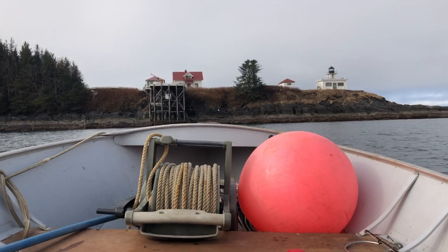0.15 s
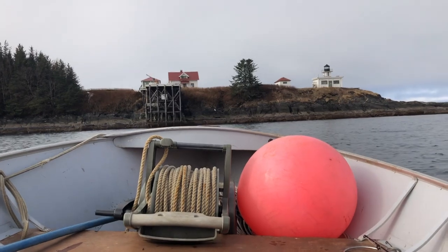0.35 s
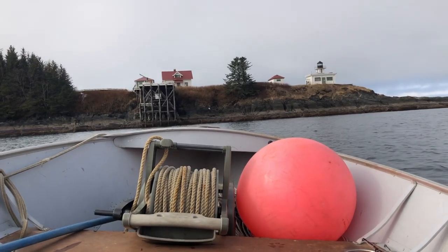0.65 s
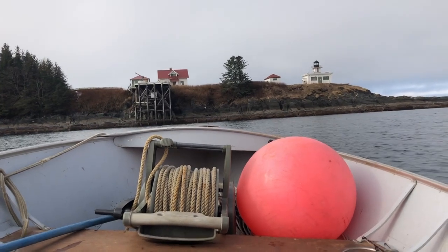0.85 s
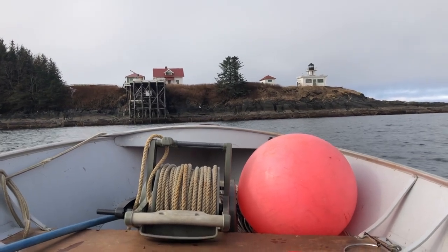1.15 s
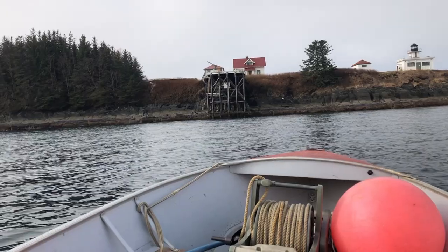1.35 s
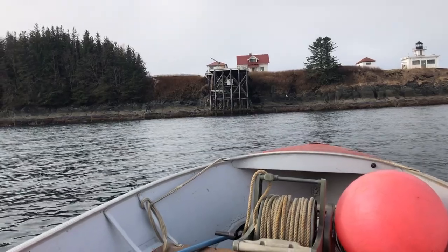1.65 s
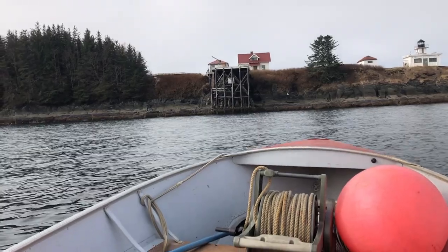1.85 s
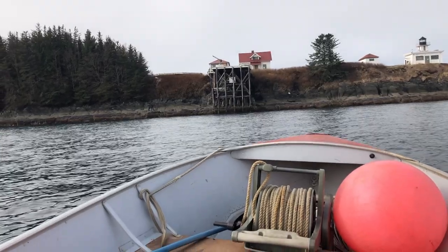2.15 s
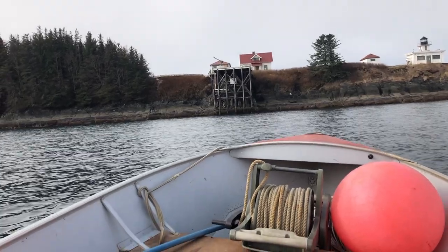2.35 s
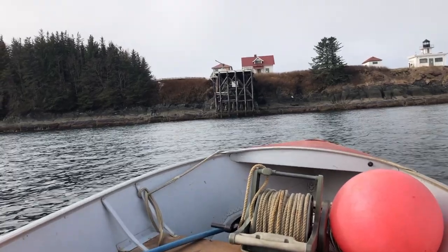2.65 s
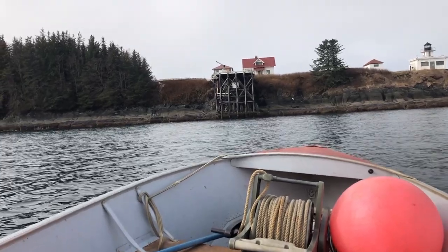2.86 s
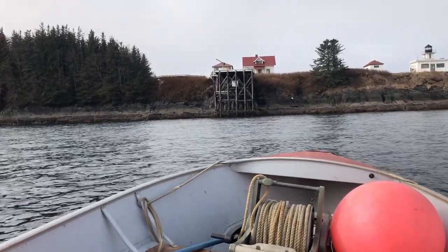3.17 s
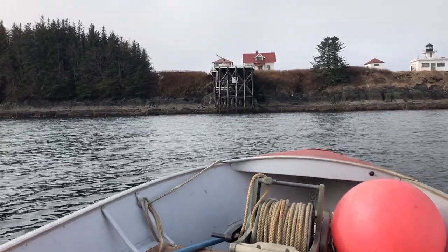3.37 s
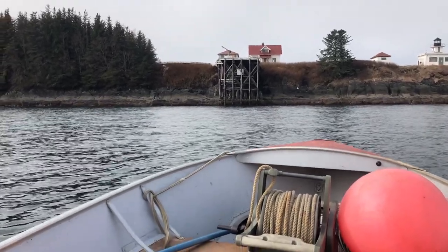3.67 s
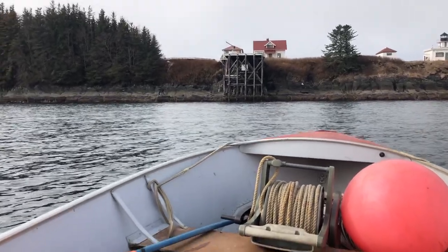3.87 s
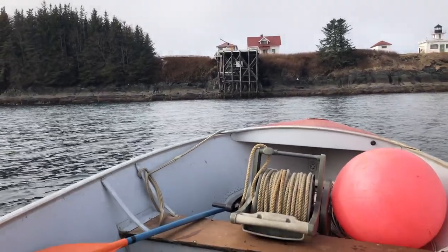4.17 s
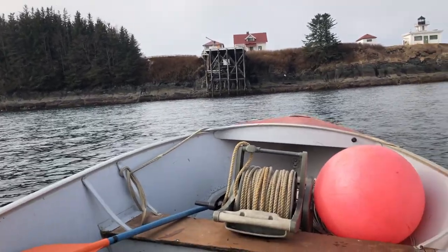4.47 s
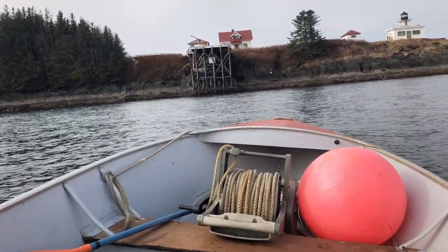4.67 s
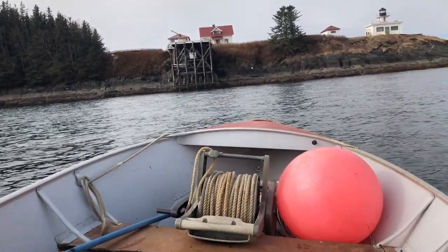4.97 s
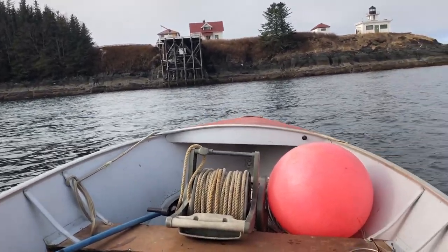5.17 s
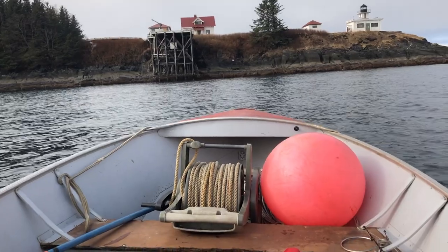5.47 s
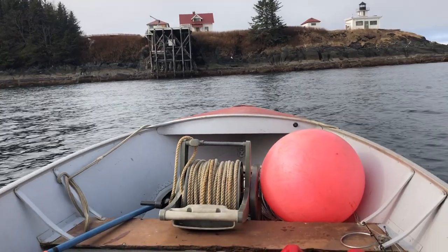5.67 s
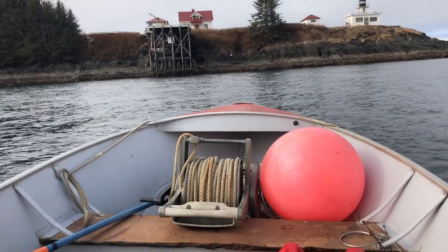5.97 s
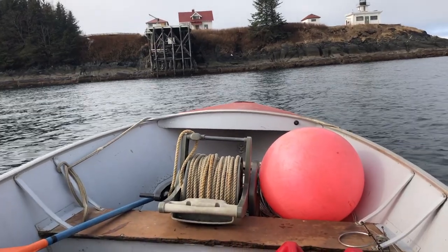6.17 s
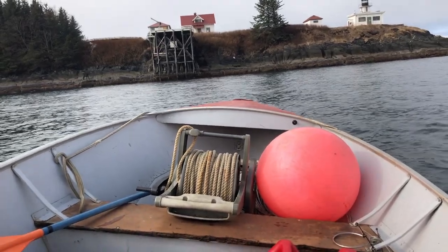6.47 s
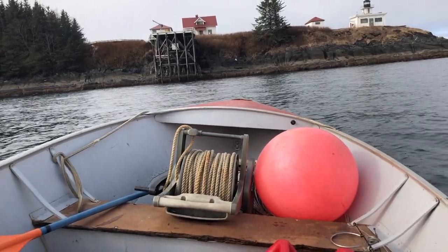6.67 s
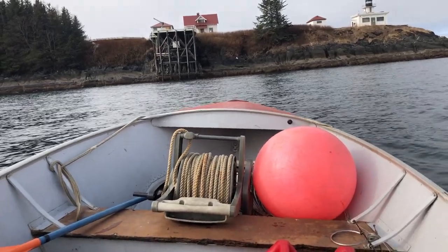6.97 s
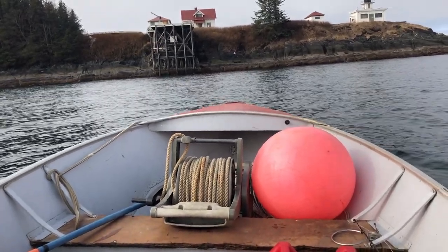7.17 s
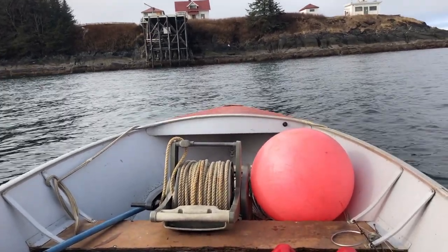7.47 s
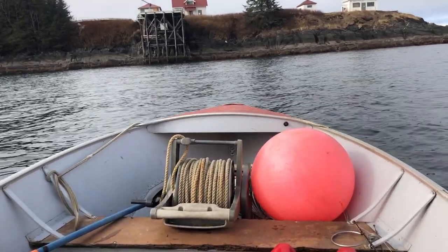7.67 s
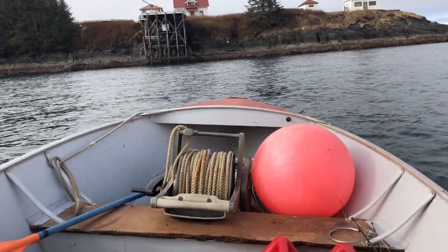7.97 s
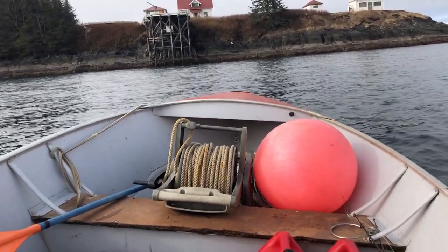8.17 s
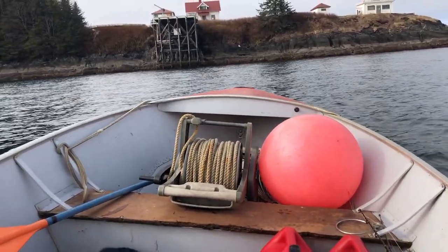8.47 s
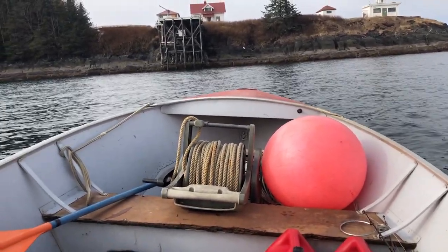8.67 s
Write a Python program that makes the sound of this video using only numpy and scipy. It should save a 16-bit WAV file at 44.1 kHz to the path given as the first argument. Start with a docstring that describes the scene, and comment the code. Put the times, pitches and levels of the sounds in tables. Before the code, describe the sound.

Heard from aboard an open metal skiff, a small outboard shakes and rattles the hull loudly with low wind bumps for about a second and fades away. It cuts back in much quieter, a quick, uneven putt-putt with hull ring. Near four seconds the throttle opens a little, smoothing the chugs into a fuller drone, while bow wash, drips, slaps and late gurgles pass close to the handheld microphone.

```python
"""A small outboard pushes an open metal skiff slowly over calm water, heard from aboard.
A loud, shaking opening fades away, then the sound cuts back in quieter; later the throttle opens a little.
Throughout, the shaft shakes the boat as sines, filtered noise and pulses chug and thump every third turn,
and resonances ring the hull. Noise and grains make the bow wash, decaying tones its thuds and drips;
low noise is wind nudging the microphone, bright noise a fine hiss."""
import sys
import numpy as np
from scipy import signal
from scipy.fft import rfft, irfft, next_fast_len
from scipy.io import wavfile
from scipy.ndimage import map_coordinates

SR = 44100
rng = np.random.default_rng(int(sys.argv[2]) if len(sys.argv) > 2 else 0)


def wrap_up_sound(samples):
    """Save the sound to the file named by the first command line argument, as 16-bit audio."""
    columns = np.atleast_2d(samples).T
    # keep every value between -1 and 1, then stretch to whole-number steps
    tamed = np.clip(columns, -1, 1)
    steps = np.round(tamed * 32767).astype(np.int16)
    wavfile.write(sys.argv[1], SR, steps)


N = 388942
T = np.arange(N) / SR
CUT_S = 1.21  # the opening ends and the quieter sound cuts in


def motion():
    """Engine cycles completed, throttle (0-1) and the boat's gain in speed (0-1), which lags behind it."""
    # Engine speed, three turns a cycle. Each row: time in seconds, rate in cycles per second.
    speed_rows = [(0, 6.78), (3.42, 6.71), (3.88, 7.58), (4.7, 7.77), (6.3, 7.665)]
    idle_hz, cruise_hz = 6.78, 7.7  # cycle rates at throttle 0 and 1
    cut_skip_cycles, hull_lag_s = .43, 3.8
    rate_hz, = curves(speed_rows)
    cycle = np.cumsum(rate_hz) / SR + cut_skip_cycles * (T >= CUT_S)
    throttle = np.clip((rate_hz - idle_hz) / (cruise_hz - idle_hz), 0, 1)
    step = 1 / (hull_lag_s * SR)
    speed = signal.lfilter([step], [1, step - 1], throttle)
    return cycle, throttle, speed


def engine(cycle, throttle, speed, fade):
    """One knock a turn, one strong firing a cycle, and the metal that they set ringing."""
    turn = 3 * cycle
    knocks = unit(beats(turn + .5, scatter_db=1.9) * amp(0.22 * np.cos(2 * np.pi * (cycle - .17))))
    surge = amp(1.0 * np.cos(2 * np.pi * (cycle - .25)) + 1.3 * np.cos(4 * np.pi * (cycle - .27)))
    opening_ring = amp(opening_then(-1, 0))
    body = exhaust(cycle, throttle) + opening_ring * hull(knocks, throttle)
    body = body + gears(turn, surge, throttle) + whoosh(cycle, throttle)
    metal = hum(turn, throttle) + whine(surge) + opening_resonance(knocks)
    return shaking(turn, throttle, speed, fade) + metal + amp(-47.5) * body


def shaking(turn, throttle, speed, fade):
    """The shaft's unbalance rocks the whole boat once a turn, with overtones at its multiples."""
    # Overtones. Each row: shaft order, relative level in dB.
    shake_orders = [(2, -12), (3, -36), (4, -17), (5, -22), (6, -46.5)]
    # rises with throttle, falls again as the boat gathers speed
    level_db = opening_then(-8, -30.5) + 5 * (throttle - 2 * speed)
    overtones = orders(turn - .07, shake_orders, unsteady_db=4.0)
    overtones = amp(opening_then(-18.5, -39.5)) * fade * overtones  # these fade deeper than the rest
    return amp(level_db) * (np.sqrt(2) * np.cos(2 * np.pi * (turn - .07)) + overtones)


def exhaust(cycle, throttle):
    """Firing pulses swell through the submerged leg and boom in the hull, over a noise rumble."""
    # Exhaust leg under water. Each row: centre in Hz, width in Hz, relative level in dB.
    pipe_modes = [(170.5, 120, 0)]
    # Hull boom. Each row: centre in Hz, width in Hz, relative level in dB.
    thump_modes = [(258.6, 5.3, -17), (330, 9.1, -15), (369.5, 24, -3)]
    # Harder exhaust under throttle. Each row: centre in Hz, width in Hz, relative level in dB.
    bark_modes = [(325, 58, 0)]
    # Rumble. Each row: frequency in Hz, relative level in dB per Hz.
    drone_spectrum = [(30, -44), (60, 0), (110, 1), (185, 2.5), (228, -2), (290, -2.5), (400, -5.5),
                      (500, -20), (900, -85)]
    thump_spectrum = [(40, -27.5), (105, 5.5), (162, 6.0), (215, 4.0),
                      (260, -12.0), (400, 5.0), (700, -25), (2000, -30)]
    pulses = beats(cycle + 0.0211 + 0.022 * throttle, scatter_db=0.5)
    firing = ring(pulses * amp(opening_then(-2, 0)), pipe_modes)
    thump = coloured(ring(firing, thump_modes), thump_spectrum)
    bark = ring(ring(firing, bark_modes), bark_modes)
    drone_db = opening_then(5, 1) + np.cos(2 * np.pi * (cycle - 0.026)) + 1.1 * wobble(8.0)
    drone = coloured(noise(), drone_spectrum) * amp(drone_db)
    return amp(-6.5 + 1.1 * throttle) * thump + drone + amp(-20 + 9.1 * throttle) * bark


def hull(knocks, throttle):
    """Each turn knocks hull and cowling into resonance; the chugs melt away as the throttle opens."""
    # Hull ring. Each row: centre in Hz, width in Hz, relative level in dB.
    hull_modes = [(242, 37, 0.5), (310, 8, -12), (368.6, 17.5, 9.5), (731, 18, 3), (828.5, 15, 1),
                  (905, 26, 0), (1143, 11, -2.5), (1776, 15, -5), (2223, 67, -10.5)]
    # Cowling at low throttle. Each row: centre in Hz, width in Hz, relative level in dB.
    chug_modes = [(259, 6.2, -2), (365.4, 5.4, 18.5), (495, 85, 1.5), (666, 28, -1), (1115, 16, -3)]
    knock = ring(0.74 * knocks + 1.94 * rasp(knocks, life_s=0.021), hull_modes)
    chug = ring(0.23 * knocks + 1.5 * rasp(knocks, life_s=0.0073), chug_modes)
    return amp(-7.5 + 2.0 * throttle) * knock + amp(-3.5 - 21.0 * throttle) * chug


def gears(turn, surge, throttle):
    """The gears repeat one rough pattern every turn, which with fresh noise makes the panels buzz."""
    # Buzzing panels. Each row: centre in Hz, width in Hz, relative level in dB.
    whirr_modes = [(724, 16, 4), (830, 14, 1.5), (934, 42, 2.5), (1215, 20, -6.5), (1336, 49, 9.5),
                   (1447, 52, 2.5), (1790, 13, -12.5), (2230, 23, -4)]
    teeth = rng.standard_normal(1900)
    mesh = teeth[(turn % 1 * len(teeth)).astype(int)]
    return amp(-9.5 + 2.8 * throttle) * ring((0.78 * mesh + noise()) * surge, whirr_modes)


def whoosh(cycle, throttle):
    """After each firing, low noise on a rising carrier sweeps upward over half a cycle."""
    stroke = np.minimum(cycle % 1 / .5, 1)
    sweep_hz = np.interp(stroke, [0, .5, 1], [900, 1500, 1850])
    carrier = np.sin(2 * np.pi * np.cumsum(sweep_hz) / SR)
    breath = coloured(noise(), [(10, -14.0), (110, -0.5), (220, -3.5)])
    return amp(-13 + 4.0 * throttle) * breath * np.sin(np.pi * stroke) * carrier


def hum(turn, throttle):
    """Steady tones on multiples of the shaft's rotation; their balance shifts with throttle."""
    # Hull and panel tones. Each row: shaft order, level in dB idling, level in dB under throttle.
    hum_orders = [(2, -58, -47.5), (3, -48, -53), (4, -60, -48), (5, -60.5, -54), (6, -54, -56.5),
                  (31, -77, -65), (36, -76, -65)]
    out = np.zeros(N)
    for order, idle_db, cruise_db in hum_orders:
        level_db = idle_db + (cruise_db - idle_db) * throttle + 1.25 * wobble(3.8)
        out += amp(level_db) * np.cos(2 * np.pi * (round(order) * turn + rng.random()))
    return np.sqrt(2) * out


def whine(surge):
    """One panel sings in spells: surging noise through the same narrow resonance twice."""
    # Singing panel. Each row: centre in Hz, width in Hz, relative level in dB.
    whine_modes = [(1469.5, 67, 0)]
    # Spells. Each row: time in seconds, level in dB.
    whine_levels = [(0, -74), (3.4, -63.5), (3.75, -54), (4.25, -65), (4.65, -51.5), (5, -57), (5.2, -66),
                    (5.87, -52.5), (6.08, -69), (6.4, -49), (6.75, -62), (7.05, -51.5), (7.5, -51.5),
                    (7.9, -62), (8.8, -52)]
    level_db, = curves(whine_levels)
    return amp(level_db) * ring(ring(noise() * surge, whine_modes), whine_modes)


def opening_resonance(knocks):
    """In the opening, bursts of noise after each knock ring a further set of the boat's resonances."""
    # Opening resonances. Each row: centre in Hz, width in Hz, relative level in dB.
    opening_modes = [(205, 50, -0.5), (345, 40, -2), (440, 33, -3), (530, 25, 0), (653, 29, 2),
                     (832, 30, 12.5), (1135, 45, 4), (1207, 40, -2.5), (1897, 44, -21.5), (2310, 65, -15)]
    return amp(-52.5) * (T < CUT_S) * ring(rasp(knocks, life_s=0.014), opening_modes)


def strokes(cycle, throttle, speed):
    """The chugs, rings and ticks of each cycle; each firing gives a rising thump, then a putt."""
    # Falling chugs, firing top, exhaust bubble, panel rings, valve ticks. Each row: share of the cycle,
    # peak dB idling, peak dB under throttle (both before the opening cut), centre pitch in Hz, life in
    # seconds, glide share, roughness share.
    stroke_rows = [ (.195, -42.5, -63, 510, .024, -0.586, 0.13), (0.58, -45, -60, 490, 0.027, -.55, 0.13),
                   (.86, -44.5, -69, 510, .024, -0.73, 0.077),
                   (0.021, -49.5, -45.5, 326.5, 0.0242, 0.18, 0.097),
                   (0.193, -49, -48, 261.6, 0.04475, 0.12, 0.018),
                   (0.096, -54.5, -53, 860, .03, 0.088, 0.064),
                   (0.2304, -64, -55, 1490, .022, 0.012, 0.063), (.91, -52, -53, 1400, .04, -0.039, 0.021),
                   (0.4, -59.5, -56.5, 1820, 0.036, 0.035, 0.029),
                   (0.23, -63, -58.5, 2250, .06, 0.01, 0.014), (.81, -57.5, -60, 2000, .035, -0.023, 0.018),
                   (.535, -59, -58, 3350, 0.019, 0.054, 0.085),
                   (.7, -62.5, -60.5, 4500, 0.012, 0.072, 0.05)]
    # Strong and weak spells of the putt. Each row: time in seconds, peak dB (before the opening cut).
    putt_levels = [(0, -52.5), (1.3, -47), (1.6, -54), (1.75, -44), (1.89, -42), (2.04, -51), (2.19, -43),
                   (2.34, -53), (2.49, -46), (2.64, -41), (2.94, -42.5), (3.08, -49), (3.23, -45),
                   (3.38, -55), (3.53, -41.5), (3.8, -39.5), (4.07, -43), (4.6, -45.5), (5, -45),
                   (8.8, -54)]
    out = np.zeros(N)
    passes = lambda phase: np.flatnonzero(np.diff(np.floor(phase)))
    for at, idle_db, cruise_db, hz, life_s, glide, rough in stroke_rows:
        for i in passes(cycle - at):
            size, detune = rng.standard_normal(2)
            db = idle_db + (cruise_db - idle_db) * throttle[i] + 1.9 * size
            add(out, T[i] - life_s / 2, amp(db) * chirp(hz * (1 + .012 * detune), life_s, glide, rough))

    thump_life_s = 0.0396  # exhaust bubble; comes earlier under throttle
    for i in passes(cycle - 0.0276 + 0.0292 * throttle):
        thump = chirp(163.6, thump_life_s, glide=0.54, rough=.06)
        db = -33 + 0.9 * throttle[i] + 0.6 * rng.standard_normal()
        add(out, T[i] - thump_life_s / 2, amp(db) * thump)

    putt_db, = curves(putt_levels)
    putt_life_s = .032
    for i in passes(cycle - 0.2465 + 0.04035 * throttle):
        putt = chirp(1319 + 50 * speed[i], putt_life_s, glide=0.084 + 0.15 * speed[i], rough=0.036)
        add(out, T[i] - putt_life_s / 2, amp(putt_db[i]) * putt)
    return out * amp(opening_then(-2, 0))


def water(speed):
    """The bow wave gurgles, fizzes and patters, changing with speed and swelling with each passing wave."""
    # Waves along the bow. Each row: crest in seconds, rise in seconds, fall in seconds,
    # wash level in dB and spray level in dB, both before the trims below.
    wave_rows = [(.25, 0.19, 0.056, -43, -49), (.56, 0.13, 0.056, -49.5, -58),
                 (2.11, 0.097, 0.018, -49, -61.5), (2.35, 0.042, 0.099, -53, -73),
                 (3.7, 0.56, .3, -56.5, -64), (4.72, 0.069, 0.32, -55, -67), (5.27, 0.046, 0.044, -57, -63),
                 (6.15, 0.14, 0.3, -55, -65), (6.4, 0.055, 0.025, -46.5, -59),
                 (7.05, 0.12, 0.39, -46.5, -58.5), (7.45, 0.064, 0.028, -50, -59),
                 (7.85, 0.13, 0.034, -47.5, -59.5), (8.16, 0.03, 0.098, -50, -66),
                 (8.7, 0.28, 0.56, -44, -61)]
    # Wash. Each row: frequency in Hz, relative level in dB per Hz.
    wash_spectrum = [(200, -8.5), (420, -3.5), (600, -4), (830, -4.7), (1150, -5.5), (1500, -10.5),
                     (1950, -13), (2400, -15), (3200, -22.5), (6000, -86)]
    # Spray. Each row: frequency in Hz, relative level in dB per Hz.
    spray_spectrum = [(900, -18), (1800, -21), (3000, 5.5), (4500, 4), (5500, 2), (6500, -5), (8000, -4),
                      (9800, -8), (12000, -12.5), (15500, -28)]
    wash_swells = [(s, rise, fall, db) for s, rise, fall, db, _ in wave_rows]
    spray_swells = [(s, rise, fall, db) for s, rise, fall, _, db in wave_rows]
    wash_db = swelling(opening_then(-46.5, -53) + 5.5 * speed, wash_swells)
    spray_db = swelling(opening_then(-61, -64.5) + 1.5 * speed, spray_swells)
    gurgle = grains(rate_hz=250, low_hz=379, high_hz=2550, cycles=2.6, spread_db=2.5)
    fizz = grains(rate_hz=540, low_hz=1820, high_hz=10380, cycles=17.0, spread_db=2.5)
    wash = coloured(noise() + 0.21 * gurgle, wash_spectrum) * amp(wash_db - 1 + 1.3 * wobble(25))
    spray = coloured(noise() + opening_then(0.31, .42) * fizz, spray_spectrum)
    spray = spray * amp(spray_db - 0.5 + 1.1 * wobble(30))
    patter_db = np.minimum(spray_db, -57.5) - 10.5  # droplets stop growing in heavy spray
    return wash + spray + amp(patter_db) * patter()


def patter():
    """Droplets of spray land as short, bright ticks of decaying noise, at rms 1."""
    # Tick colour. Each row: frequency in Hz, relative level in dB per Hz.
    patter_spectrum = [(2000, -22.5), (4300, 8.5), (5500, 0), (7500, -1.5), (10000, -4), (13000, -14)]
    drops_per_s, spread_db, life_s = 70, 3.5, .0025
    hits = (rng.random(N) < drops_per_s / SR) * amp(spread_db * np.clip(noise(), -2, 1.5))
    return coloured(lag(hits, life_s) * noise(), patter_spectrum)


def splashes():
    """Single waves thud and slap on the hull, drops fall back and larger bubbles chirp."""
    # Waves under the bow. Each row: start in seconds, level in dB before a 7.5 dB cut, pitch that it
    # sags to in Hz, t60 in seconds.
    thud_rows = [(1.047, -10.5, 249, 0.083), (1.345, -15.5, 268, 0.072), (2.326, -20, 246, 0.12),
                 (3.208, -17.5, 254, 0.14), (3.767, -21, 261, 0.11), (6.355, -23.5, 257, 0.19),
                 (6.705, -24, 272, 0.089)]
    # Wavelets on the side. Each row: start in seconds, level in dB, t60 in seconds, tilt in dB per octave.
    slap_rows = [(1.347, -42, 0.079, -0.5), (2.318, -29.5, 0.034, 0), (2.784, -38, 0.032, 0.5),
                 (6.693, -33.5, 0.11, -2)]
    # Slap colour before tilt. Each row: frequency in Hz, relative level in dB per Hz.
    slap_spectrum = [(250, 1), (550, 2), (950, 8), (1500, 3), (2900, -11), (5600, -15.5), (9000, -38)]
    # Drops falling back. Each row: start in seconds, level in dB, pitch in Hz, t60 in seconds.
    drop_rows = [(0.43, -53, 5200, .025), (0.832, -58.5, 7000, .03), (1.047, -40, 1980, 0.028),
                 (1.517, -66, 7500, .015), (1.667, -66, 7000, .015), (1.817, -59, 7500, .02),
                 (2.006, -60, 12500, .01), (2.05, -55, 5200, .025), (2.082, -57, 7000, .025),
                 (2.104, -55, 8100, 0.023), (2.357, -54, 7200, .014), (2.39, -51, 2350, .03),
                 (2.401, -51.5, 3800, 0.043), (2.703, -56, 7500, 0.013), (2.732, -59, 8000, .015),
                 (3.156, -47, 2130, 0.043), (3.544, -61, 6000, .015), (3.59, -62, 7500, .03),
                 (4.539, -51, 4870, .022), (4.788, -58, 8000, .012), (4.857, -60, 6500, 0.023),
                 (5.215, -59, 8000, .012), (5.269, -41, 3160, 0.012), (5.738, -61, 7000, .025),
                 (5.88, -51, 4770, 0.025), (6.035, -56, 5500, .02), (6.123, -62, 5800, .02),
                 (6.317, -57, 7550, .018), (6.383, -56, 8400, .02), (6.396, -58, 7200, .03),
                 (6.669, -46, 7800, 0.0091), (6.738, -48.5, 3600, 0.047), (6.819, -50.5, 3400, 0.048),
                 (6.894, -61, 7700, .035), (7.444, -64, 7200, .03), (7.499, -44, 3700, 0.016),
                 (7.637, -59, 6800, .03), (8.154, -50, 4520, 0.037), (8.434, -58, 5760, .02),
                 (8.564, -52, 5500, .025), (8.663, -39, 2480, 0.019)]
    # Bubbles and gulps. Each row: start in seconds, peak in dB, centre pitch in Hz, life in seconds,
    # glide share.
    bubble_rows = [(0.466, -41, 1220, 0.029, .05), (1.065, -55, 3600, 0.091, -0.06),
                   (2.375, -53, 2600, 0.03, 0.83), (2.509, -53.5, 5280, 0.022, .06),
                   (3.15, -43, 2066, 0.027, -0.455), (4.98, -39.5, 416, 0.051, .2),
                   (5.256, -41.5, 1115, 0.036, -0.6), (6.98, -40, 1114, 0.019, 0.31),
                   (7.311, -42.5, 333, 0.066, 0.013), (7.532, -53.5, 6170, 0.023, -0.012),
                   (7.546, -38, 717, 0.062, 1.3), (7.558, -47, 1240, 0.028, -.3),
                   (7.664, -44, 1170, .022, -.1), (7.698, -44, 1367, 0.022, .05),
                   (7.72, -48, 905, 0.039, 1.1), (8.138, -40, 730, 0.029, 0.28),
                   (8.388, -36, 754, 0.019, -0.3), (8.412, -33, 283.5, 0.063, 0.52),
                   (8.456, -32, 300, 0.061, 0.28), (8.609, -38.5, 365, 0.046, -0.094),
                   (8.63, -43, 607, 0.03, 0.0095), (8.675, -38, 503, 0.044, 0.033),
                   (8.688, -39, 952, 0.039, 0.56)]
    out, t = np.zeros(N), np.arange(SR // 3) / SR
    for s, db, hz, t60_s in thud_rows:
        sag = 1 + 0.049 * np.exp(-t / 0.011)
        tone = np.sin(2 * np.pi * np.cumsum(hz * sag) / SR)
        add(out, s, amp(db - 7.5 - 60 * t / t60_s) * (1 - np.exp(-t / 0.0027)) * tone)
    for s, db, t60_s, tilt_db in slap_rows:
        colour = [(hz, level + tilt_db * np.log2(hz / slap_spectrum[0][0])) for hz, level in slap_spectrum]
        burst = coloured(noise(), colour)[:len(t)]
        add(out, s, amp(db - 60 * t / t60_s) * (1 - np.exp(-t / 0.001)) * burst)
    for s, db, hz, t60_s in drop_rows:
        band = signal.butter(3, [hz * .75, min(hz * 1.3, SR / 2 - 1)], "bandpass", fs=SR)
        splat = unit(signal.lfilter(*band, rng.standard_normal(len(t))))
        drop = 1.06 * np.sin(2 * np.pi * hz * t) + 0.98 * splat
        add(out, s, amp(db - 60 * t / t60_s) * (1 - np.exp(-t * hz)) * drop)
    for s, db, hz, life_s, glide in bubble_rows:
        rough = 0.021 + 0.15 * abs(glide) * (hz > 1500)  # fast, high glides splash
        add(out, s, amp(db) * chirp(hz, life_s, glide, rough))
    return out


def wind(throttle):
    """Air pressure swings as the boat rocks under throttle; low noise buffets in gusts, with a few bumps."""
    # Gusts on the microphone. Each row: peak in seconds, rise in seconds, fall in seconds, level in dB.
    gust_rows = [(0, 0.092, 0.76, -27.5), (3.6, 0.05, 0.091, -33), (3.88, 0.17, 0.12, -32),
                 (4.33, 0.071, 0.12, -34), (7.08, 0.037, 0.068, -33), (7.32, 0.048, 0.041, -39)]
    # Buffeting. Each row: frequency in Hz, relative level in dB per Hz.
    buffet_spectrum = [(8, -59), (18, -6), (35, -2.5), (75, -6.5), (110, -12), (170, -26), (400, -61.5)]
    # Slow air pressure. Each row: frequency in Hz, relative level in dB per Hz.
    sway_spectrum = [(.5, -23.5), (2, 12.5), (4, 14.5), (8, -18.5), (14, -18), (25, -19), (60, -53)]
    # Bumps on the microphone. Each row: centre in seconds, peak in dB, pitch in Hz, half-length in seconds.
    bump_rows = [(0.706, -17, 79, 0.019), (0.744, -13, 81.6, 0.021), (0.843, -8, 77, 0.017),
                 (3.587, -20.5, 79, 0.0086), (3.864, -21, 78, 0.019), (4.319, -30, 80, 0.026),
                 (7.052, -25, 81, 0.018), (7.302, -32, 101, 0.018)]
    rock_period_s, rock_crest_s = 0.99, 4.63
    buffet_db = swelling(-47 + 0.5 * throttle, gust_rows) + 0.75 * wobble(25)
    sway_db = -22 + 5.5 * throttle * np.cos(2 * np.pi * (T - rock_crest_s) / rock_period_s)
    out = coloured(noise(), buffet_spectrum) * amp(buffet_db)
    out += coloured(noise(), sway_spectrum) * amp(sway_db)
    for s, db, hz, half_s in bump_rows:
        u = np.clip((T - s) / half_s, -1, 1)
        out += amp(db) * np.cos(np.pi * u / 2) ** 2 * np.cos(2 * np.pi * hz * (T - s))
    return out


def hiss():
    """Fine coloured noise that wavers and swells."""
    # Hiss colour. Each row: frequency in Hz, relative level in dB per Hz.
    air_spectrum = [(1500, 5.5), (3000, -4), (5200, -3), (6500, -23), (8200, -5.5), (9700, 3.5),
                    (11500, -5), (13500, -4), (15700, -8)]
    # Swells. Each row: peak in seconds, rise in seconds, fall in seconds, level in dB.
    hiss_swells = [(2.8, .2, .3, -68.5), (5, .35, .3, -71), (7.2, .25, .25, -85)]
    return amp(swelling(-73, hiss_swells) + 1.1 * wobble(18)) * coloured(noise(), air_spectrum)


def amp(db):
    """Decibels to gain."""
    return 10 ** (np.asarray(db) / 20)


def unit(x):
    """Scaled to rms 1."""
    return x / np.sqrt(np.mean(x ** 2) + 1e-20)


def curves(rows):
    """One value per sample for each column after the time."""
    s, *cols = np.transpose(rows)
    return [np.interp(T, s, c) for c in cols]


def opening_then(opening, later):
    """One value in the opening, another after the cut."""
    return np.interp(T, [CUT_S - .012, CUT_S], [opening, later])


def swelling(steady_db, swells):
    """Level in dB of a steady sound plus swells (s, rise s, fall s, dB) that add in power."""
    power = amp(steady_db) ** 2
    for s, rise_s, fall_s, db in swells:
        power = power + amp(db) ** 2 * np.exp(-((T - s) / np.where(T < s, rise_s, fall_s)) ** 2)
    return 10 * np.log10(power)


def wobble(rate_hz):
    """A smooth random curve, rate_hz knots a second."""
    return map_coordinates(rng.standard_normal(int(N * rate_hz / SR) + 4), [T * rate_hz])


def noise():
    """Fresh white noise."""
    return rng.standard_normal(N)


def filtered(x, response):
    """x times a complex response of frequency."""
    size = next_fast_len(N + SR // 2)
    return irfft(rfft(x, size) * response(np.fft.rfftfreq(size, 1 / SR)), size)[:N]


def coloured(x, points):
    """x through a (Hz, dB) spectrum that closes an octave above its last point, at rms 1."""
    hz, db = np.transpose([*points, (2 * points[-1][0], -140)])
    return unit(filtered(x, lambda f: amp(np.interp(np.log(f + 1), np.log(hz + 1), db))))


def ring(x, modes):
    """x through resonances (Hz, width Hz, dB) that pass little above the highest one, at rms 1."""
    edge_hz = 1.2 * max(hz for hz, _, _ in modes)

    def response(f):
        peaks = sum(amp(db) * 1j * f * w / (c * c - f * f + 1j * f * w) for c, w, db in modes)
        return peaks / (1 + 1j * f / edge_hz - (f / edge_hz) ** 2)

    return unit(filtered(x, response))


def beats(phase, scatter_db):
    """An impulse of uneven size each time the phase passes a whole number."""
    ticks = np.diff(np.floor(phase), append=np.floor(phase[-1]))
    return ticks * amp(scatter_db * np.clip(noise(), -2, 2))


def lag(x, life_s):
    """x through a one-pole exponential decay."""
    return signal.lfilter([1], [1, -np.exp(-1 / (life_s * SR))], x)


def rasp(blows, life_s):
    """Every impulse becomes a short burst of noise with a soft front, at rms 1."""
    rise_s = 0.0018
    return unit(lag(lag(blows, life_s), rise_s) * noise())


def grains(rate_hz, low_hz, high_hz, cycles, spread_db):
    """Many tiny bubbles: damped sines of random pitch and size, at rms 1."""
    when, pitch, size = rng.random((int(rate_hz * N / SR), 3)).T[:, :, None]
    hz, k = low_hz * (high_hz / low_hz) ** pitch, np.arange(300)
    turns = hz * k / SR
    decay = np.exp(-turns / cycles) * (1 - k / len(k))
    wave = amp(-spread_db * np.log(size + 0.0065)) * np.sin(2 * np.pi * turns) * decay
    return unit(np.bincount(((when * N).astype(int) + k).ravel(), wave.ravel(), N)[:N])


def orders(turn, table, unsteady_db):
    """Unsteady sines on multiples of the shaft's rotation, at rms 1."""
    first = table[0][0]
    out = np.zeros(N)
    for order, db in table:
        phase = 2 * np.pi * round(order) * turn + (order - first) * rng.normal(0, 0.27)
        out += amp(db + unsteady_db * wobble(11.0)) * np.cos(phase)
    return unit(out)


def chirp(hz, life_s, glide, rough):
    """A soft-edged tone of peak 1 that glides through hz while its pitch trembles."""
    t = np.arange(SR // 10) / SR
    u = np.minimum(t / life_s, 1)
    tremble = np.interp(t, np.linspace(0, t[-1], 60), rng.standard_normal(60))
    pitch_hz = hz * (np.exp(glide * (u - .5)) + rough * tremble)
    return np.sin(np.pi * u) ** 2 * np.sin(2 * np.pi * (np.cumsum(pitch_hz) / SR + rng.random()))


def add(track, s, sound):
    """Mix a sound in at time s."""
    part = track[max(0, round(s * SR)):][:len(sound)]
    part += sound[:len(part)]


def scene():
    """Engine, water, wind and hiss; all fades low before the sound cuts back in."""
    cycle, throttle, speed = motion()
    fade_s, return_s, fade_power, floor_db = 0.48, 0.024, 0.7, -27.5
    fade = np.clip(np.maximum((CUT_S - T) / fade_s, (T - CUT_S) / return_s), 0, 1) ** fade_power
    fade = np.maximum(fade, amp(floor_db))
    motor = engine(cycle, throttle, speed, fade) + strokes(cycle, throttle, speed)
    return (motor + water(speed) + splashes() + wind(throttle) + hiss()) * fade


def record(dry):
    """The largest swings are rounded off, the end is eased out and nothing is kept above the band limit."""
    top_hz, ease_s = 15720, .004
    rounded = dry / (1 + np.abs(dry) ** 8) ** (1 / 8)
    ease = np.minimum((T[-1] - T) / ease_s, 1)
    return filtered(rounded * ease, lambda hz: hz < top_hz)


dry = scene()
out = record(dry)
wrap_up_sound(out)
```